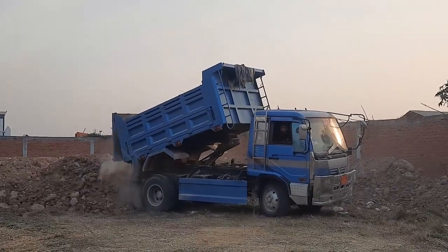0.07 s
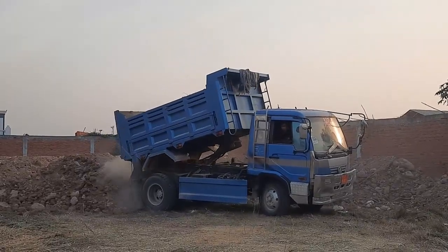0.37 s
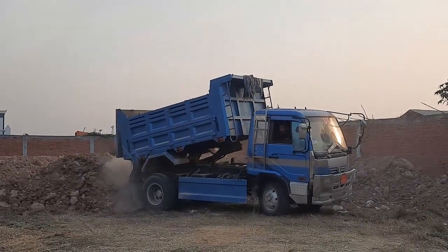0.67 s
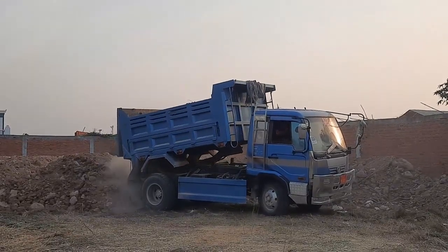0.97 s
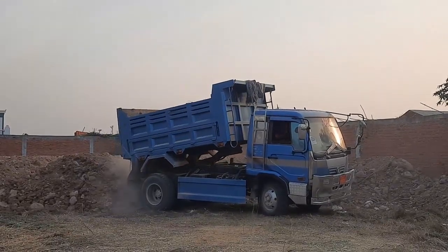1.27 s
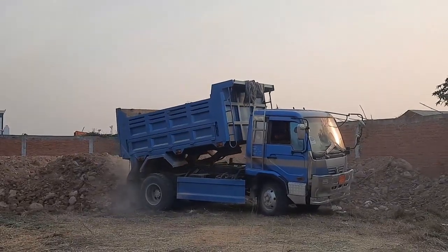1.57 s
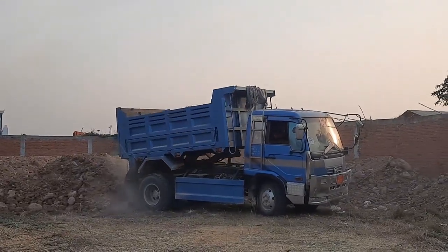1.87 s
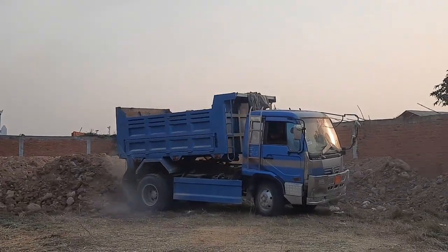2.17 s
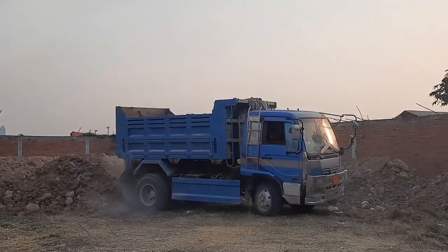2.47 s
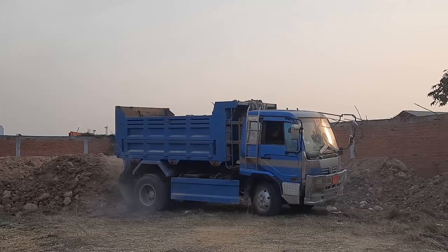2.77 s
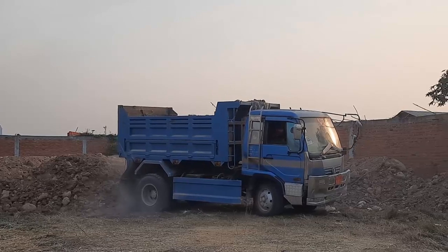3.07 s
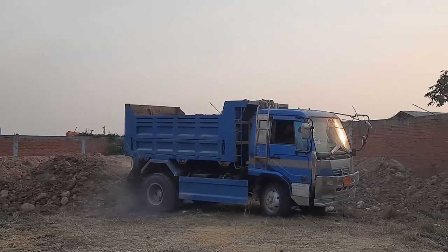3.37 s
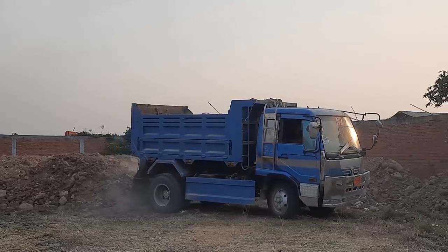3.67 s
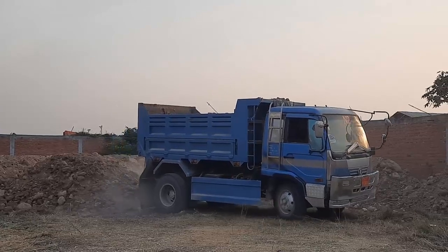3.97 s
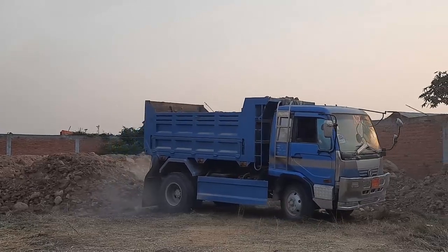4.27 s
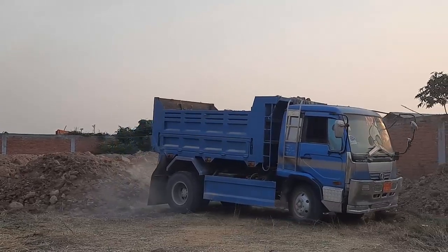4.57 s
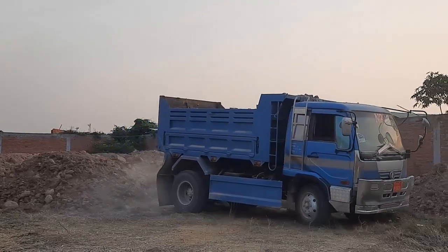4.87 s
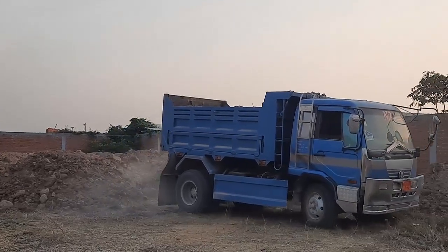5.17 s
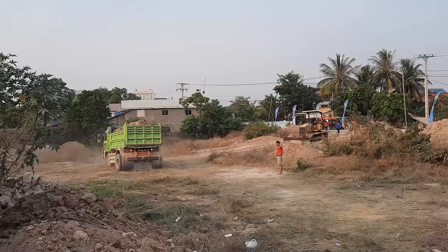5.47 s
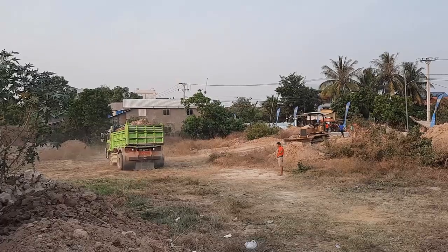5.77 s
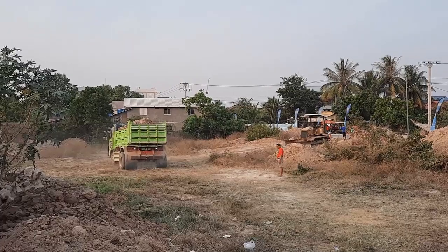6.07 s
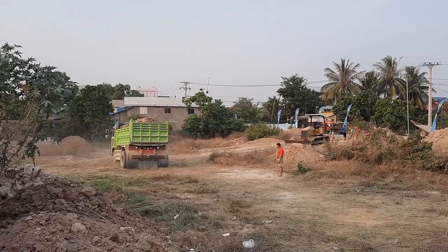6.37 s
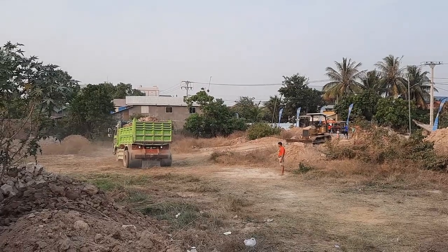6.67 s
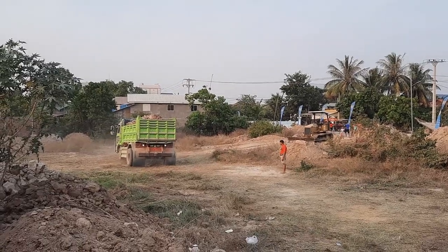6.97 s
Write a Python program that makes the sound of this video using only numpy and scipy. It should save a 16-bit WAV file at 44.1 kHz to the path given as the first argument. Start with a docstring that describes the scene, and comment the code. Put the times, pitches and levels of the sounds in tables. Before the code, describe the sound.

Close by on an open dirt lot, a dump truck's diesel rumbles as it lowers its empty steel bed. The tailgate bangs four times, setting the panels ringing and rattling. The engine revs in surges as the truck pulls away, with stones snapping under the tyres, chassis clanks and a brief hiss. The sound cuts off, and a quieter truck rumbles in the distance with faint bird chirps.

```python
"""Dump truck on a dirt lot

Stereo microphone in the open, close to a truck lowering its empty steel bed. The tailgate bangs four
times and sets the panels ringing. The diesel idles, then revs as the truck pulls away, stones snapping
under the tyres, chassis clanking. The sound cuts off; after a short silence another truck works farther
away, with a small high chirper and birds echoing in the bushes."""
import sys
import numpy as np
from scipy import signal
from scipy.fft import rfft, irfft, next_fast_len
from scipy.io import wavfile

SR = 44100
rng = np.random.default_rng(int(sys.argv[2]) if len(sys.argv) > 2 else 0)


def pcm_store(signal):
    """Save signal as 16-bit PCM."""
    levels = np.round(np.clip(np.atleast_2d(signal), -1, 1) * 32767)
    wavfile.write(sys.argv[1], SR, levels.astype(np.int16).T)


N = 318843
T = np.arange(N) / SR
HZ = np.maximum(np.fft.rfftfreq(N, 1 / SR), 1)
SIDES = np.array([[1], [-1]])   # left, right
NEAR_END_S, FAR_START_S = 5.437, 5.586

# The tailgate strikes the bed. Each row: start in seconds, relative level in dB, thud in dB,
# treble in dB, share of the full ring time.
GATE_BLOWS = [(0.289, -6, 3, -1.5, 0.91), (1.043, -29, 10, -2, 0.59), (1.141, -28, 10, 0, 1),
              (1.188, -3, -7.5, -5.5, 0.69), (1.940, -8, -2.5, -9, 0.59), (1.969, -10.5, -16, -14.5, 0.7),
              (2.667, -15, 5, -1.5, 0.46)]
# How alike the two sides are near the truck. Each row: frequency in Hz, coherence from 0 to 1.
NEAR_COHERENCE = [(30, 0.61), (60, 0.82), (130, 0.94), (380, 0.97), (900, 0.82), (2400, 0.26), (5000, 0)]
# The left side hears more of the presence range. Each row: frequency in Hz, left minus right in dB.
LEFT_BIAS = [(380, 1), (700, 3), (1300, 2.5), (2400, 7.5), (4400, 5.5), (8000, 0.5)]


def from_db(db):
    """Decibels to gain."""
    return 10 ** (np.asarray(db) / 20)


def rms_one(x):
    """Scale so that the centre of the stereo image has rms 1."""
    return x / np.sqrt(np.mean(np.atleast_2d(x).mean(0) ** 2) + 1e-20)


def in_time(rows):
    """One curve for each column after the first, which holds seconds."""
    times, *columns = np.transpose(rows)
    return [np.interp(T, times, column) for column in columns]


def at_hz(points, hz):
    """Read a table on a log-frequency axis."""
    freqs, values = np.transpose(points)
    return np.interp(np.log(hz), np.log(freqs), values)


def pan(db):
    """Gains that put the left side db above the right."""
    return from_db(SIDES * db / 2)


def ease(x):
    """A smooth step from 0 to 1 around x = 0."""
    return .5 + .5 * np.tanh(x / 2)


def placed(s, sound):
    """A short sound set to start at s seconds."""
    out, start = np.zeros(N), int(s * SR)
    out[start:start + len(sound)] = sound[:max(N - start, 0)]
    return out


def drift(rate):
    """A random wander of rms 1 that turns rate times a second."""
    knots = rng.standard_normal(int(T[-1] * rate) + 2)
    return rms_one(np.interp(T * rate, np.arange(len(knots)), knots))


def resonances(table, hz):
    """Gain of a set of resonances at the given frequencies."""
    return np.sqrt(sum(from_db(db) ** 2 / (1 + (2 * (hz - f) / width) ** 2) for f, width, db in table))


def noise(gain, coherence=NEAR_COHERENCE):
    """Stereo noise of rms 1, coloured by a gain per frequency; the sides part toward the treble."""
    size = next_fast_len(N, True)
    hz = np.maximum(np.fft.rfftfreq(size, 1 / SR), 1)
    alike = np.clip(at_hz(coherence, hz), -.99, .99)
    mid, side = rfft(rng.standard_normal((2, size))) * np.interp(hz, HZ, gain)
    spectra = mid + SIDES * side * np.sqrt((1 - alike) / (1 + alike))
    return rms_one(irfft(spectra * pan(at_hz(LEFT_BIAS, hz)), size)[:, :N])


def crowded_modes(ripple_db, spacing_hz):
    """Steel has countless modes: a fine pattern of peaks and dips above the bass."""
    knots = rng.standard_normal(size=4000)
    ripple = np.interp(HZ / spacing_hz, np.arange(len(knots)), knots)
    return from_db(ripple_db * ripple * HZ / (HZ + 700))


def firing_pulse(firings, decay, depth, uneven_db):
    """Each firing is a quick swell that dies away; no two are equally strong."""
    strength = from_db(uneven_db * rng.uniform(-1, 1, 1000))[firings.astype(int) % 1000]
    phase = firings % 1
    swell = rms_one(strength * phase * np.exp(-phase / decay))
    return rms_one(1 - depth + depth * swell)


def exhaust(firings, firing_hz, even, note_db, rumble_db, waver_db):
    """Uneven firing rumbles; under load it settles into clean orders that swell in the pipe."""
    # The exhaust note. Each row: multiple of the crank rate, relative level in dB.
    orders = [(2, -26.5), (3, -26), (4, -6), (5, -10.5), (6, -6), (7, 2.5), (8, -10), (9, -8.5), (10, -2),
              (14, -8), (15, -8.5), (18, -6.5)]
    # Pipe resonances. Each row: centre in Hz, width in Hz, relative level in dB.
    pipe_modes = [(84.4, 32, 2), (145.5, 14, 1.5), (333, 92, -11.5)]
    # Colour of the rumble. Each row: frequency in Hz, relative density in dB.
    rumble_spectrum = [(25, -28), (45, -51), (68, -2), (90, 10.5), (120, -5), (148, 3.5), (190, 0),
                       (240, -11.5), (340, -25.5), (600, -60)]
    gains = [from_db(db) * resonances(pipe_modes, order * firing_hz / 2) for order, db in orders]
    note = np.zeros(N)
    for gain, (order, _) in zip(gains, orders):
        waver = from_db(waver_db * drift(18))
        note += gain * waver * np.sin(np.pi * (order * firings + 2 * rng.random()))
    note /= np.sqrt(sum(gain ** 2 for gain in gains) / 2)
    rumble = noise(from_db(at_hz(rumble_spectrum, HZ)))
    rumble *= firing_pulse(firings, decay=0.25, depth=0.3, uneven_db=3.0)
    note_gain = from_db(note_db) * np.sqrt(even) * pan(1.6)
    return note_gain * note + from_db(rumble_db) * np.sqrt(1 - even) * rumble


def hum(waver_db, wander_rad):
    """The truck drones on a few steady, slightly wavering tones."""
    # Each row: frequency in Hz, relative level in dB.
    tones = [(88, -32.5), (153, -32), (340, -46)]
    out = np.zeros(N)
    for hz, db in tones:
        gain = np.sqrt(2) * from_db(db + waver_db * drift(13))
        out += gain * np.sin(2 * np.pi * hz * T + wander_rad * drift(7))
    return out


def clatter(firings, even, hiss_db, ring_db, split_hz):
    """Diesel knock at every firing; load makes it harder and rings the block; fine hiss lies on top."""
    # Colour of the knock. Each row: frequency in Hz, relative density in dB.
    spectrum = [(140, -44), (230, -6), (334, -1.5), (611, -9.5), (704, -5), (969, -17), (1200, -11),
                (1560, -20), (1740, -16.5), (2120, -19), (2960, -17.5), (4300, -27), (11800, -40),
                (14900, -36.5), (16000, -50)]
    # Engine block resonances. Each row: centre in Hz, width in Hz, relative level in dB.
    block_modes = [(1100, 67, -1.5), (1218.7, 69, 2), (1793, 81, -2), (2360, 140, -5), (2930, 79, -4.5)]
    load = np.sqrt(even)
    rattle = noise(from_db(at_hz(spectrum, HZ)) * crowded_modes(ripple_db=2, spacing_hz=39.88))
    hiss = signal.sosfiltfilt(signal.butter(4, split_hz, "high", fs=SR, output="sos"), rattle)
    ring = from_db(ring_db) * load * noise(resonances(block_modes, HZ) ** 2)   # squared: sharper peaks
    pulse = firing_pulse(firings, decay=0.3, depth=.16 + 0.12 * load, uneven_db=6.5)
    return (rattle - hiss + ring) * pulse + hiss * from_db(hiss_db + 1.3 * drift(36))


def diesel(rolling, roll_s):
    """Effort drives the near engine's exhaust, drone and clatter; the clatter is louder on the move."""
    # The driver's foot. Each row: time in seconds, firings per second, effort as exhaust gain in dB.
    throttle = [(0, 23.5, -38), (.25, 31.4, -34), (.6, 26.6, -25), (1.0, 28, -28.5), (1.85, 28.3, -28),
                (2.3, 33, -24.5), (2.62, 35, -23.5), (2.85, 36, -17), (3.02, 31.4, -20.5),
                (3.33, 36.2, -14.5), (3.58, 35.8, -20), (3.78, 43, -14.5), (4.19, 42.4, -12),
                (4.32, 45.8, -11), (4.48, 47, -22), (4.78, 29.1, -26), (5.2, 40.2, -19),
                (5.43, 35.2, -19.5)]
    idle_db, settle_db = -30, -17   # effort at idle, and where the firing turns even
    firing_hz, effort_db = in_time(throttle)
    firings = np.cumsum(firing_hz) / SR
    push_db = effort_db - idle_db
    even = 0.14 + 0.86 * ease((effort_db - settle_db) / 1.55)
    note_share = np.minimum(even, .98)
    pipe = exhaust(firings, firing_hz, note_share, note_db=-0.5, rumble_db=-2, waver_db=1.14)
    drone_db = np.minimum(-4 + 0.7 * push_db, 5.5)
    drone = from_db(drone_db) * hum(waver_db=2.0, wander_rad=0.48) * pan(1.2)
    drone *= np.sqrt(1 - note_share)   # under load the drone gives way to the exhaust note
    # A thin hiss at the very top of the treble comes in and slowly grows.
    hiss_db = -20.5 * (1 - rolling) + rolling * (-0.5 + 2.5 * (T - roll_s))
    knock_db = -42 + 0.59 * push_db + 4.5 * rolling
    knock = clatter(firings, even, hiss_db, ring_db=-10, split_hz=14000)
    return from_db(effort_db) * pipe + drone + from_db(knock_db) * knock


def gate_strikes(hard_db=-10):
    """Every contact of the tailgate: its blows, and the rebounds of the hard ones."""
    # Each row: delay in seconds, dB below the blow, thud in dB, treble in dB added to the blow's,
    # share of the full ring time.
    rebounds = [(.096, 18.5, -2, 4, .55), (.209, 21, 7, 3, .72), (.309, 26, -4, 2, .58)]
    bounces = [(s + delay, db - loss_db, thud_db, treble_db + blow_treble_db, length)
               for s, db, _, blow_treble_db, _ in GATE_BLOWS if db > hard_db
               for delay, loss_db, thud_db, treble_db, length in rebounds]
    return list(GATE_BLOWS) + bounces


def blow_colour(hz, thud_db, treble_db):
    """Heavy blows stir the bass; hard ones the treble."""
    return from_db(thud_db / (1 + (hz / 300) ** 2) + treble_db / (1 + (1500 / hz) ** 2))


def panels(crack_db, crack_s, rise_s, chatter_db):
    """Each blow cracks, then the crowded panel modes die band by band while the loose gate chatters."""
    # Colour of the panels. Each row: frequency in Hz, relative density in dB.
    spectrum = [(40, -19), (70, -6), (130, -5.5), (190, -1), (270, -11.5), (360, -6.5), (470, -7.5),
                (670, -5), (950, -14), (1270, -12.5), (1500, -16.5), (3200, -14), (4200, -29), (16000, -50)]
    # Their full ring time. Each row: frequency in Hz, seconds to fall 60 dB.
    ring_times = [(60, 0.43), (150, 0.91), (350, 0.77), (800, 0.78), (3000, 0.71), (6000, 0.8),
                  (14000, 0.79)]
    edges = np.geomspace(45, 16000, 19)
    centres = np.sqrt(edges[1:] * edges[:-1])
    share = from_db(at_hz(spectrum, centres)) * np.sqrt(np.diff(edges))
    steel = crowded_modes(ripple_db=3.5, spacing_hz=35.02)
    ringing = [noise(steel) for _ in range(2)]   # neighbouring bands take separate noises
    out, t = np.zeros((2, N)), T[:SR]
    for k, hz in enumerate(centres):
        power = np.zeros(N)
        crack = from_db(crack_db) * np.exp(-t / crack_s) / (1 + (6500 / hz) ** 2)
        rise = 1 - np.exp(-t / (rise_s + 1 / hz))
        for s, db, thud_db, treble_db, length in gate_strikes():
            tail = from_db(-60 * t / (length * at_hz(ring_times, hz)))
            force = from_db(db / 2)   # only hard blows crack sharply
            gain = from_db(db) * blow_colour(hz, thud_db, treble_db)
            power += placed(s, (gain * (tail + force * crack) * rise) ** 2)
        bandpass = signal.butter(2, edges[k:k + 2], "band", fs=SR, output="sos")
        out += share[k] * np.sqrt(power) * rms_one(signal.sosfilt(bandpass, ringing[k % 2]))
    return from_db(chatter_db * drift(170)) * out / np.linalg.norm(share)


def bed_ring(level_db, spread_db):
    """The strongest modes of the steel bed clang, a little differently at every blow."""
    # Each row: frequency in Hz, relative level in dB, full ring time in seconds to fall 60 dB.
    modes = [(102.7, -6.5, .6), (147.9, -2.5, 1.0), (182.2, -1.5, 0.45), (229, -8.5, .4),
             (265, -15.5, 0.59), (317.5, -10, 0.66), (387, -11, 1), (469, -14, 0.48), (498, -7, 0.35),
             (551, -7, 0.63), (650, -0.5, 0.42), (682, 0.5, 0.41), (708.5, -2, 0.58), (791, -7.5, 0.81),
             (1016, -24, 0.38), (1127, -11, 0.73), (1231, -6.5, 0.48), (1337, -14, 1), (1994, -18, 0.25),
             (2160, -33, .5), (2400, -9, .3), (2520, -18, 0.33), (3030, -12, 0.32), (3590, -22.5, 0.32),
             (9700, -8.5, 0.18)]
    out, t, strikes = np.zeros((2, N)), T[:SR], gate_strikes()
    chance = rng.standard_normal((len(strikes), len(modes), 3))
    for m, (hz, mode_db, t60) in enumerate(modes):
        wave = np.exp(2j * np.pi * hz * t) * (1 - np.exp(-t * hz / 2))
        apart_rad = np.arccos(at_hz(NEAR_COHERENCE, hz)) / 2   # phase spread between the sides
        for (s, db, thud_db, treble_db, length), (vary, phase, skew) in zip(strikes, chance[:, m]):
            softness_db = db * hz / 15000   # gentle blows hardly reach the high modes
            gain = from_db(level_db + db + softness_db + mode_db + spread_db * vary)
            gain = gain * blow_colour(hz, thud_db, treble_db) * pan(at_hz(LEFT_BIAS, hz))
            rotation = np.exp(1j * (np.pi * phase + apart_rad * skew * SIDES))
            start, n = int(s * SR), min(SR, int(t60 * length * SR))
            decay = from_db(-60 * t[:n] / (t60 * length))
            out[:, start:start + n] += gain * (rotation * wave[:n]).real * decay
    return out


def steel_snap(level_db, decay_s, delay_s, centre_hz, octaves):
    """Bare steel meeting steel: a few milliseconds of bright snap, far stronger on hard blows."""
    age = T[:SR // 20] / decay_s
    snaps = sum(placed(s + delay_s, from_db(1.5 * db + treble_db) * age * np.exp(1 - age))
                for s, db, _, treble_db, _ in gate_strikes())
    colour = np.exp(-(np.log2(HZ / centre_hz) / octaves) ** 2)
    return from_db(level_db) * snaps * noise(colour, coherence=[(100, 0.81), (10000, 0.3)])


def floor_thump(level_db, hz, delay_s, width_s):
    """A moment after each heavy blow the whole floor of the bed heaves for a cycle or two."""
    t = T[:SR // 8]
    heave = np.exp(-((t - delay_s) / width_s) ** 2) * np.sin(2 * np.pi * hz * t)
    return sum(placed(s, from_db(level_db + db + thud_db / 2) * heave)
               for s, db, thud_db, _, _ in GATE_BLOWS if db > -20)


def hiss_swells():
    """Short, soft swells of high hiss, one a brief chirp-like "tss"."""
    # Each row: peak time in seconds, length in seconds, centre in Hz, width in steps of 0.7 octave,
    # level in dB.
    swells = [(0.752, 0.036, 8920, 1.3, -53.5), (4.842, 0.03, 6370, 0.72, -45),
              (4.935, 0.053, 10860, 2.8, -41), (5.955, 0.087, 5270, .6, -58.5),
              (6.285, 0.16, 5460, 1.6, -55), (6.867, 0.2, 5370, .9, -55.5)]
    out = np.zeros((2, N))
    for s, length, hz, width, db in swells:
        during = np.abs(T - s) < 2 * length
        edges = np.clip(hz * 2 ** (np.array([-.5, .5]) * width * .7), 100, 20000)
        band = signal.butter(1, edges, "band", fs=SR, output="sos")
        hiss = rms_one(signal.sosfilt(np.vstack([band, band]), rng.standard_normal((2, SR))))
        swell = np.exp(-(2 * (T[during] - s) / length) ** 2)
        out[:, during] += from_db(db) * swell * hiss[:, :during.sum()]
    return out


def gravel(rolling, stones_per_s, level_db, spread_db, t60_s, centre_hz, octaves):
    """Stones snap at random under the rolling tyres: many small, a few large."""
    sizes = from_db(level_db + spread_db * np.minimum(rng.exponential(1, N), 3))
    snaps = sizes * (rng.random(N) < stones_per_s * rolling / SR)
    envelope = signal.lfilter([1], [1, -from_db(-60 / (t60_s * SR))], snaps + 1e-18)
    return envelope * noise(np.exp(-(np.log2(HZ / centre_hz) / octaves) ** 2))


def chassis_clanks(chatter_db):
    """Bumps in the ground knock the chassis, which rings, chatters and dies quickly."""
    # Each row: start in seconds, level in dB, seconds to fall 60 dB.
    bumps = [(2.87, -26.5, 0.13), (3.108, -30.5, .1), (3.226, -25, 0.069), (3.255, -27, 0.12),
             (3.447, -26, 0.074), (4.257, -18.5, 0.078), (4.278, -32, .4), (5.056, -32.5, 0.18),
             (5.298, -32, 0.094)]
    # Chassis resonances. Each row: centre in Hz, width in Hz, relative level in dB.
    modes = [(1236, 66, 3), (1780, 120, -7.5), (2390, 220, -8), (2970, 140, -2.5), (4700, 700, -19)]
    envelope = sum((T > s) * from_db(db - 60 * np.maximum(T - s, 0) / t60) for s, db, t60 in bumps)
    return from_db(chatter_db * drift(220)) * envelope * noise(resonances(modes, HZ))


def near_truck(roll_s):
    """Close to the microphone: the engine, the banging bed and, from about roll_s, the wheels."""
    rolling = ease((T - roll_s) / .13)
    engine = diesel(rolling, roll_s)
    bed = panels(crack_db=18.5, crack_s=0.015, rise_s=0.00051, chatter_db=1.0)
    bed += bed_ring(level_db=-4.0, spread_db=0.5)
    bed += steel_snap(level_db=-7, decay_s=0.0031, delay_s=.0008, centre_hz=5000, octaves=1.3)
    bed += floor_thump(level_db=-8.5, hz=76, delay_s=.022, width_s=0.012)
    stones = gravel(rolling, stones_per_s=45, level_db=-48, spread_db=1.5, t60_s=0.054,
                    centre_hz=4170, octaves=1.16)
    return engine + bed + stones + chassis_clanks(chatter_db=1.5)


def far_truck():
    """Distance blurs the firing into a rumble and a soft clatter; both swell with effort."""
    # The truck labours over uneven ground. Each row: time in seconds, effort as rumble level in dB.
    effort = [(5.6, -40), (5.82, -36.5), (6.03, -38), (6.2, -32.5), (6.29, -37.5), (6.54, -33.5),
              (6.67, -36.5), (6.8, -34), (7.22, -34)]
    # Colours of the rumble and the clatter. Each row: frequency in Hz, relative density in dB.
    rumble_spectrum = [(25, -47), (55, -6.5), (80, 0), (100, 10), (130, 3.5), (185, -0.5), (230, -10),
                       (310, -12), (390, -2.5), (470, -13.5), (600, -48)]
    clatter_spectrum = [(350, -12), (550, -9), (780, -0.5), (1050, -0.5), (1280, -6), (2200, -12.5),
                        (2900, -11.5), (4300, -21), (5300, -24), (8000, -29), (11000, -37), (13200, -29),
                        (15000, -55)]
    # How alike the two sides are at this distance. Each row: frequency in Hz, coherence from 0 to 1.
    coherence = [(30, .7), (60, 0.98), (150, .97), (380, 0.92), (950, 0.31), (2400, 0)]
    rumble_db, = in_time(effort)
    push_db = rumble_db - rumble_db[T > FAR_START_S].mean()
    fade_in_db = -6 * np.exp(-np.maximum(T - FAR_START_S, 0) / .07)
    knock_db = -44 + 0.54 * push_db + fade_in_db
    firings = np.cumsum(34 + 0.52 * drift(3)) / SR
    rumble = from_db(rumble_db) * noise(from_db(at_hz(rumble_spectrum, HZ)), coherence)
    knock = from_db(knock_db) * noise(from_db(at_hz(clatter_spectrum, HZ)), coherence)
    return (rumble + knock) * firing_pulse(firings, decay=0.16, depth=0.18, uneven_db=3.0)


def whistle(s, length, start_hz, end_hz, db, quaver):
    """One quavering note that holds its pitch and then bends away."""
    progress = np.linspace(0, 1, int(length * SR))
    wobble = np.interp(progress, np.linspace(0, 1, 12), rng.standard_normal(size=12))
    hz = (start_hz + (end_hz - start_hz) * progress ** 3) * (1 + quaver * wobble)
    return placed(s, from_db(db) * np.sin(np.pi * progress) * np.sin(2 * np.pi * np.cumsum(hz) / SR))


def chirper(level_db, pairs, gap_s):
    """Thin falling chirps in pairs: a quick run, then one at half the pace."""
    # Each row: start of the run in seconds, seconds from pair to pair.
    runs = [(5.59, .0917), (6.14, .1826)]
    times = [start + k * period + gap for start, period in runs
             for k in range(pairs) for gap in (0, gap_s)]
    return sum(whistle(s, .029, start_hz=9300, end_hz=8660, db=level_db + 1.5 * rng.normal(),
                       quaver=0.009) for s in times)


def bird():
    """A bird in the bushes whistles a few short notes."""
    # Each row: start in seconds, length in seconds, first and last pitch in Hz, level in dB.
    notes = [(5.61, .035, 5100, 4930, -57), (5.655, 0.04, 5000, 5460, -53), (5.947, 0.038, 4900, 5760, -54),
             (6.7, .045, 6800, 6750, -52), (6.732, .02, 5200, 4500, -50), (7.15, .04, 6800, 6850, -56),
             (7.178, 0.03, 5060, 4800, -45)]
    return sum(whistle(*note, quaver=0.031) for note in notes)


def twitter(level_db, spread_db, count):
    """Far birds scatter tiny gliding notes through the bushes."""
    out = np.zeros(N)
    for when, length, first, last, distance in rng.random((count, 5)):
        s = FAR_START_S + when * (T[-1] - FAR_START_S)
        out += whistle(s, 0.011 + 0.021 * length, start_hz=4600 + 1400 * first,
                       end_hz=4600 + 1400 * last, db=level_db - spread_db * distance, quaver=0.028)
    return out


def bush_echoes(calls, level_db, decay_s):
    """The bushes scatter the calls into a short blur, different on each side."""
    t = T[:SR // 8]
    echoes = rng.standard_normal((2, len(t))) * np.exp(-t / decay_s)
    echoes /= np.linalg.norm(echoes, axis=1, keepdims=True)
    return from_db(level_db) * signal.fftconvolve(calls[None], echoes, axes=1)[:, :N]


def scene():
    """The near truck cuts off; after a moment of silence come the distant one and the wildlife."""
    near_fade = np.exp(-np.maximum(T - NEAR_END_S, 0) / 0.0052)
    far_fade = np.clip((T - FAR_START_S) / 0.0041, 0, 1)
    near, far = near_truck(roll_s=2.46), far_truck()
    calls = chirper(level_db=-60, pairs=6, gap_s=.042) + bird()
    calls += twitter(level_db=-57, spread_db=9, count=45)
    wildlife = calls + bush_echoes(calls, level_db=-1, decay_s=0.021)
    return near_fade * near + far_fade * (far + wildlife) + hiss_swells()


def record(dry):
    """The loudest bangs overload softly; the top of the treble is cut."""
    knee, cutoff_hz = .7, 15900
    over = np.maximum(np.abs(dry) - knee, 0)
    held = np.clip(dry, -knee, knee) + np.sign(dry) * (1 - knee) * np.tanh(over / (1 - knee))
    return signal.sosfilt(signal.ellip(10, .1, 70, cutoff_hz, fs=SR, output="sos"), held)


dry = scene()
out = record(dry)
pcm_store(out)
```